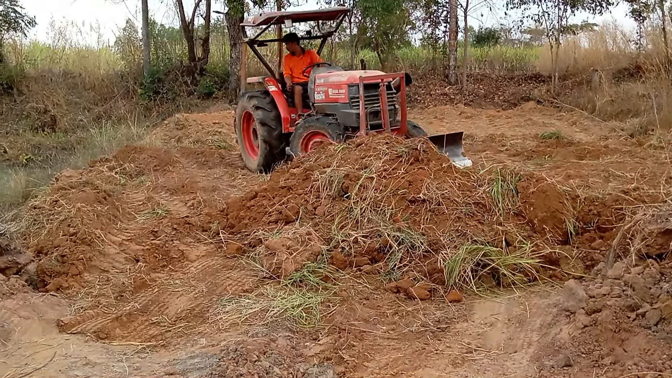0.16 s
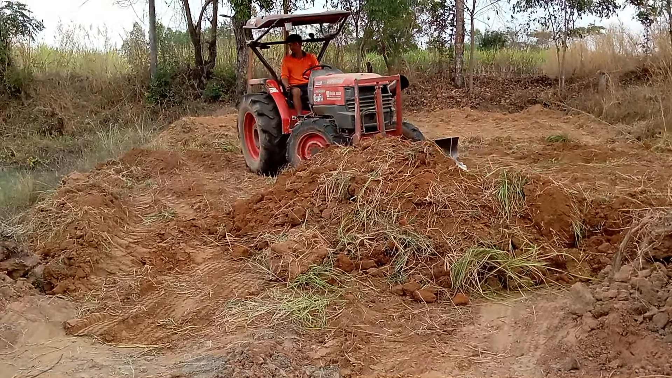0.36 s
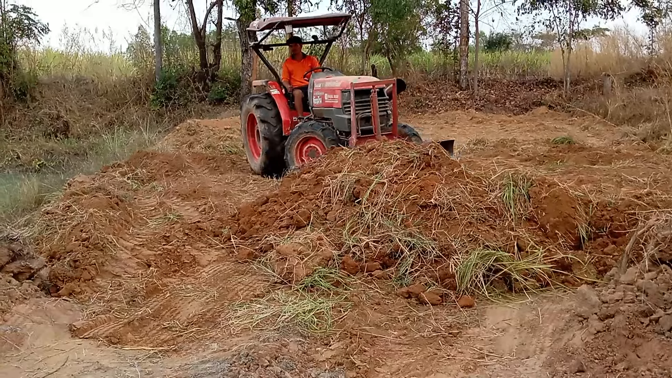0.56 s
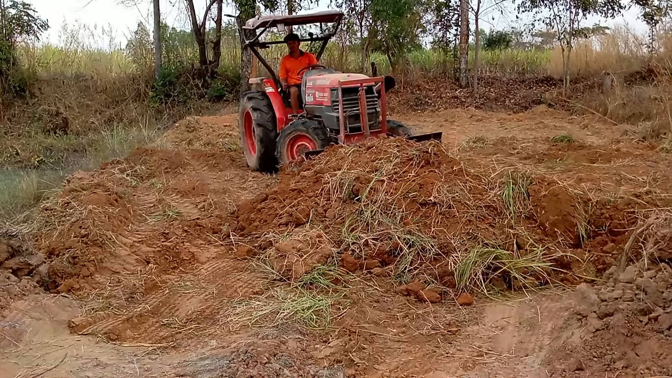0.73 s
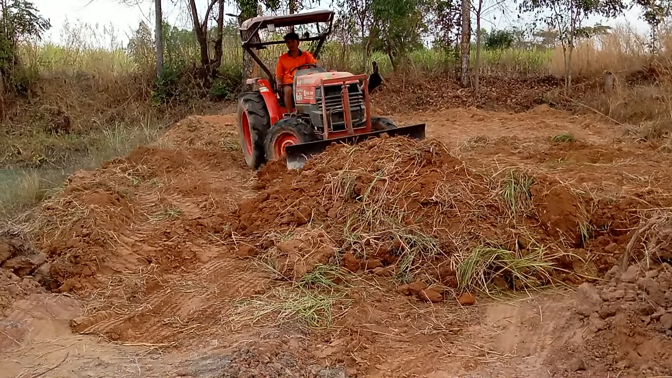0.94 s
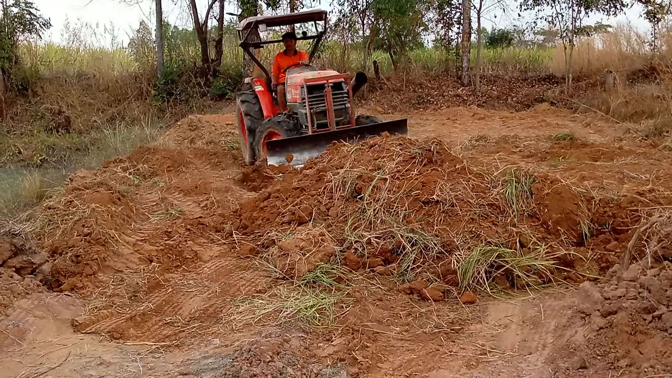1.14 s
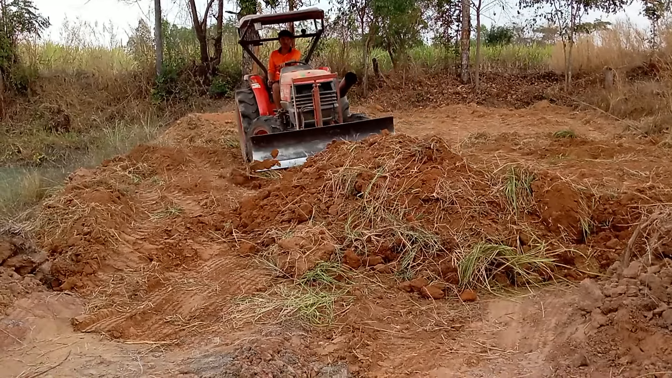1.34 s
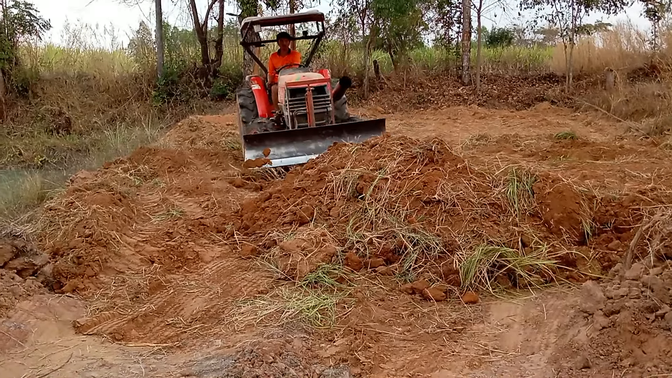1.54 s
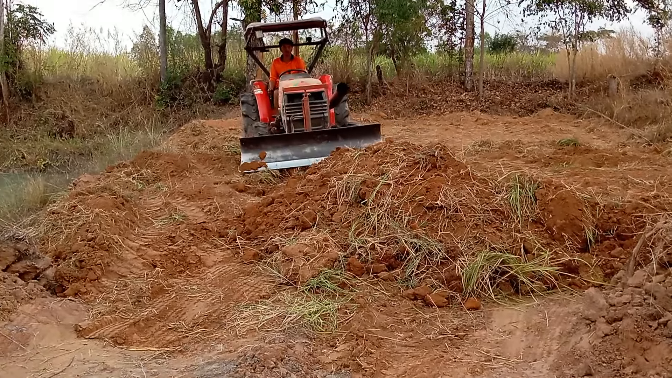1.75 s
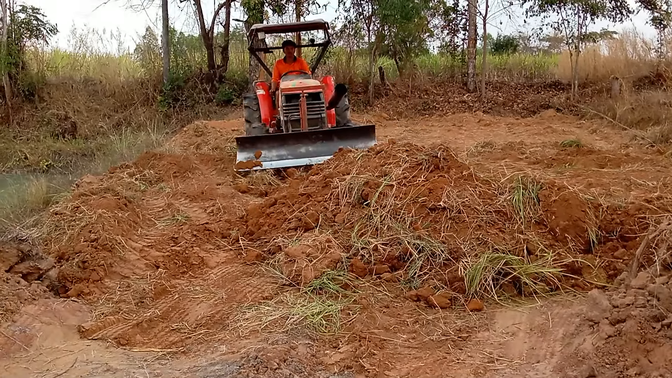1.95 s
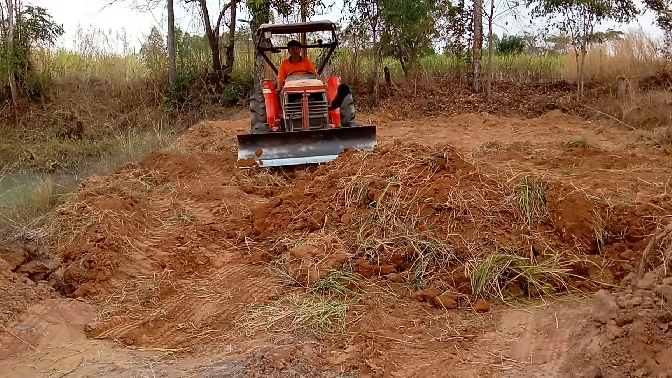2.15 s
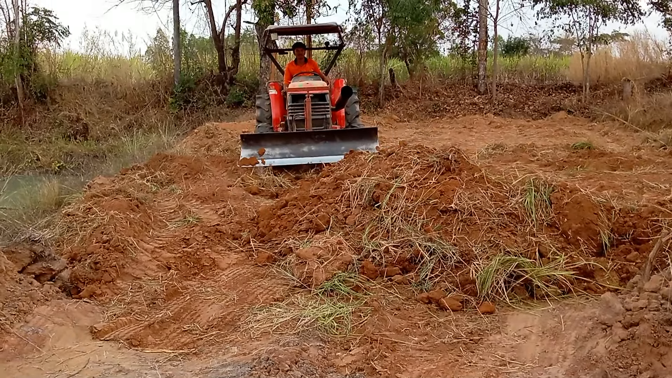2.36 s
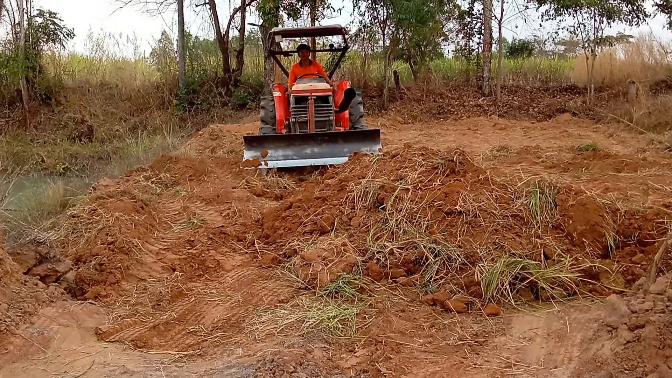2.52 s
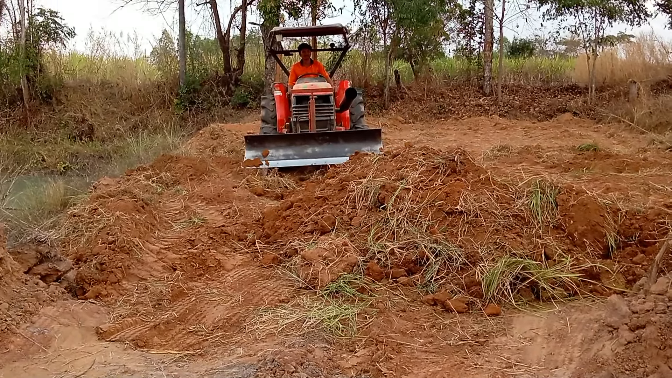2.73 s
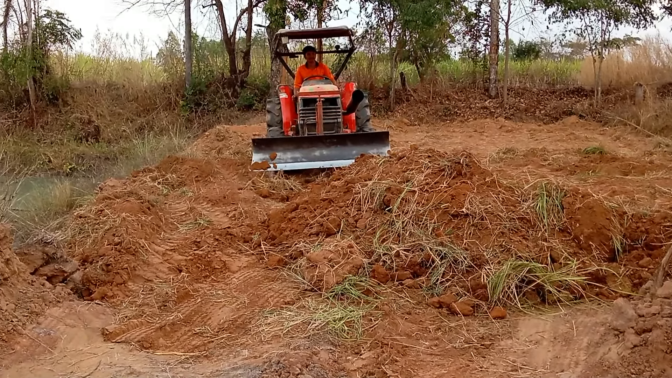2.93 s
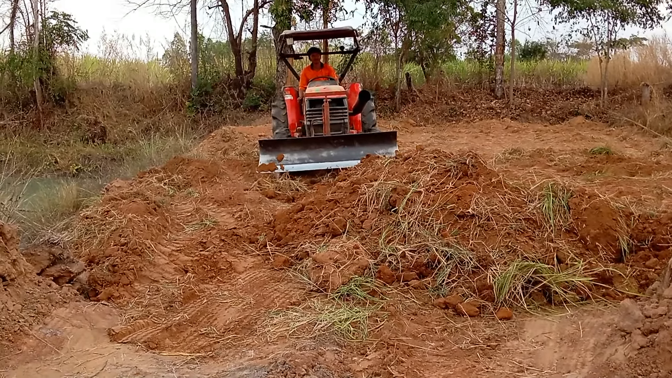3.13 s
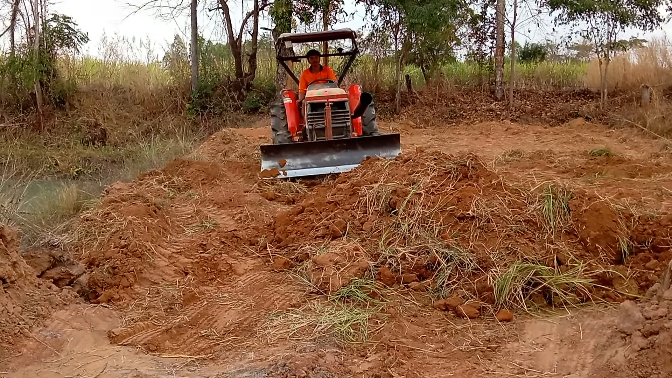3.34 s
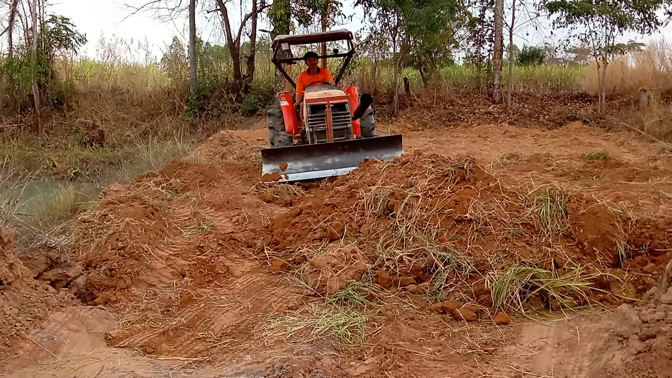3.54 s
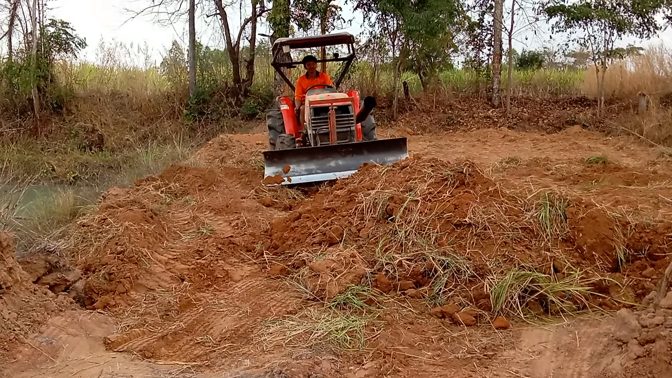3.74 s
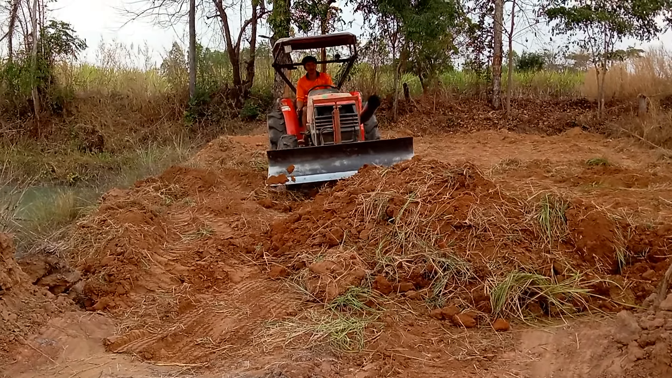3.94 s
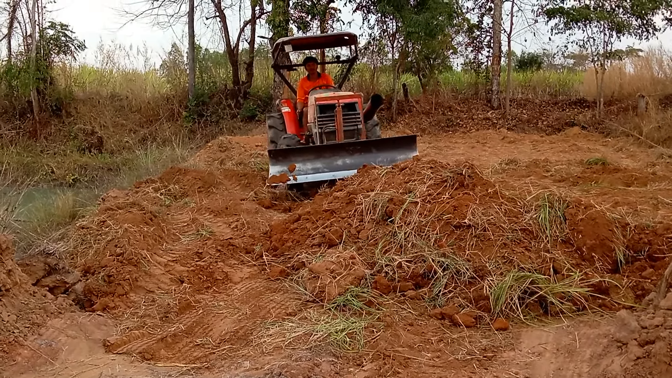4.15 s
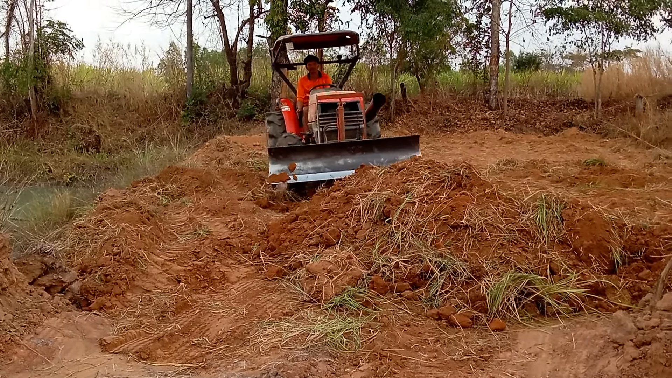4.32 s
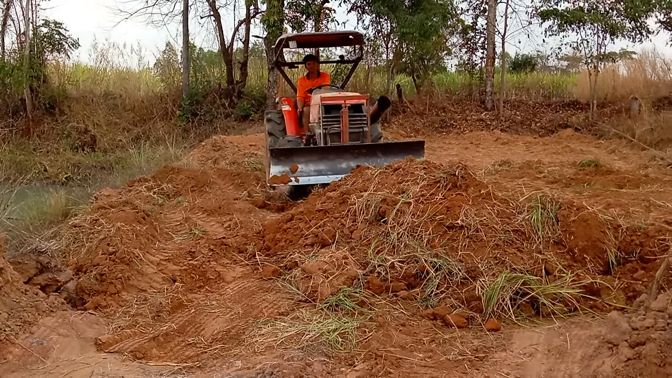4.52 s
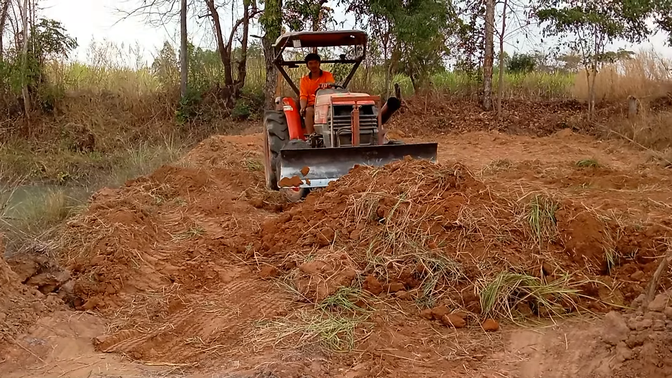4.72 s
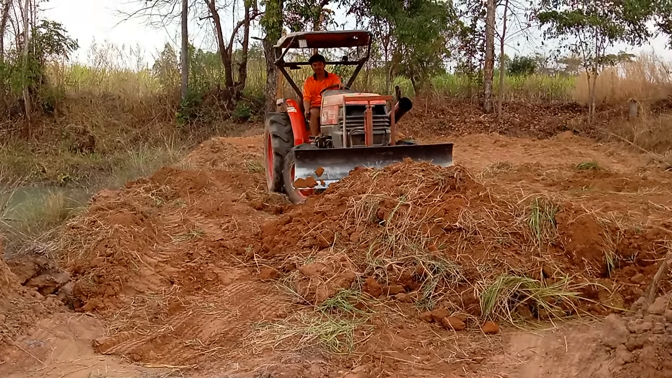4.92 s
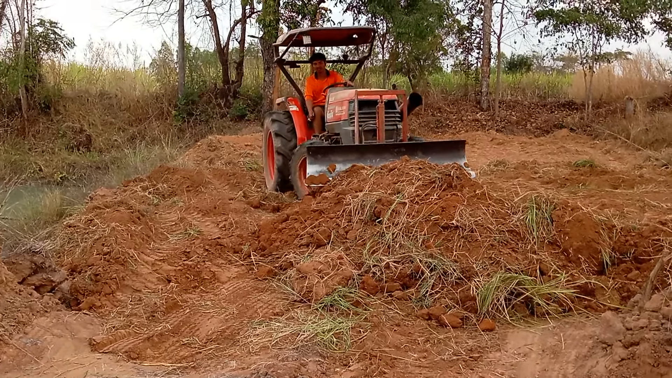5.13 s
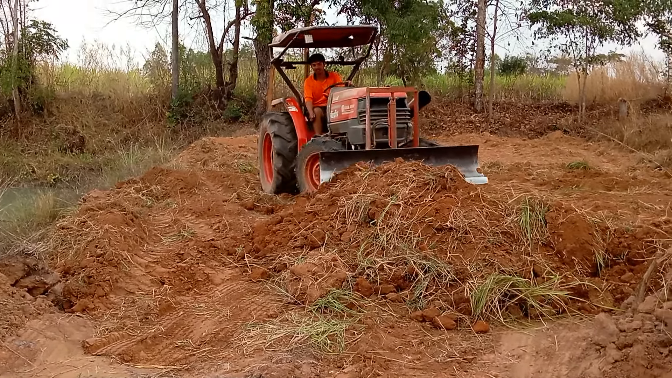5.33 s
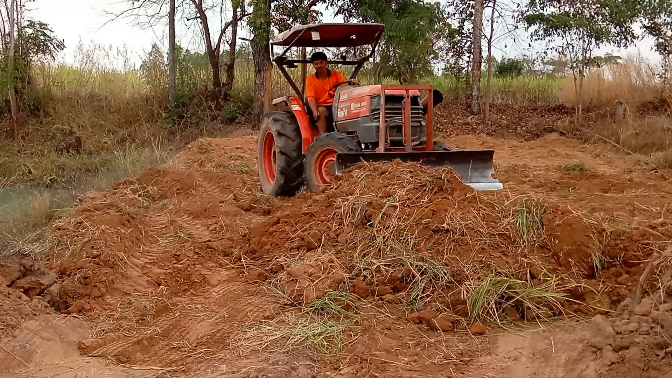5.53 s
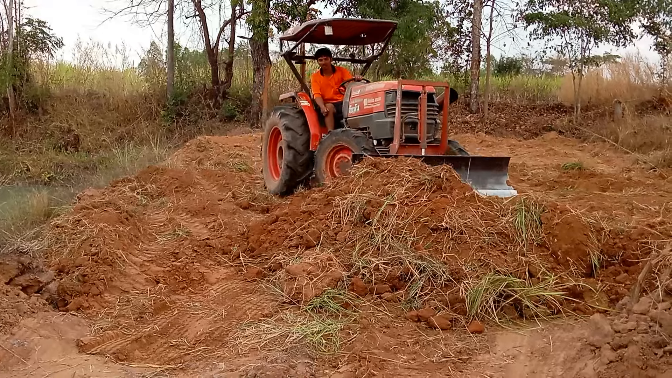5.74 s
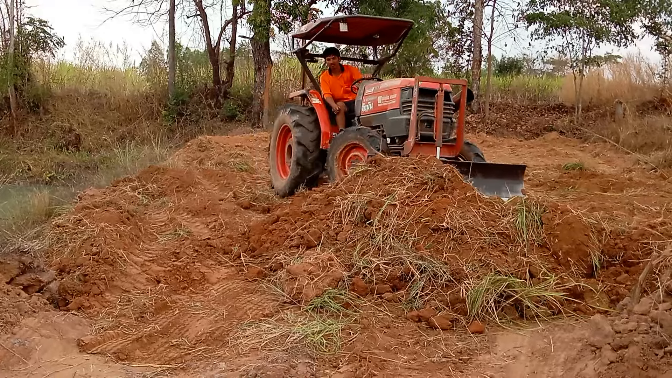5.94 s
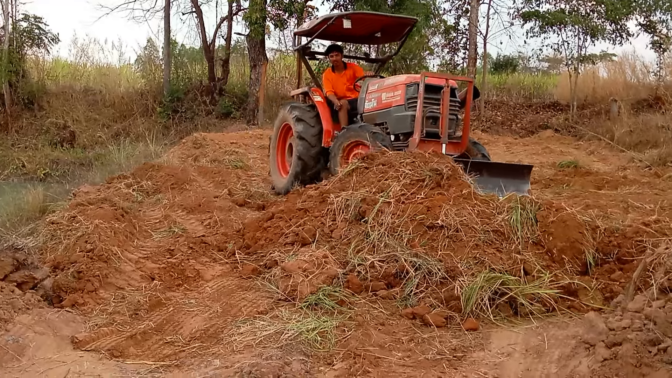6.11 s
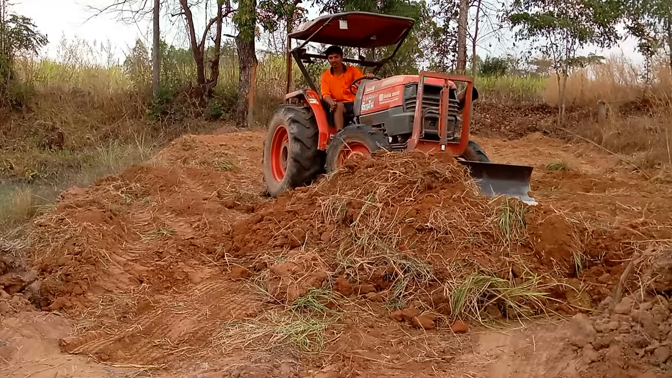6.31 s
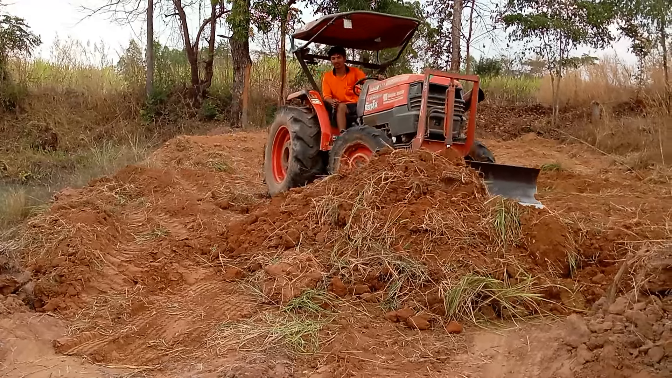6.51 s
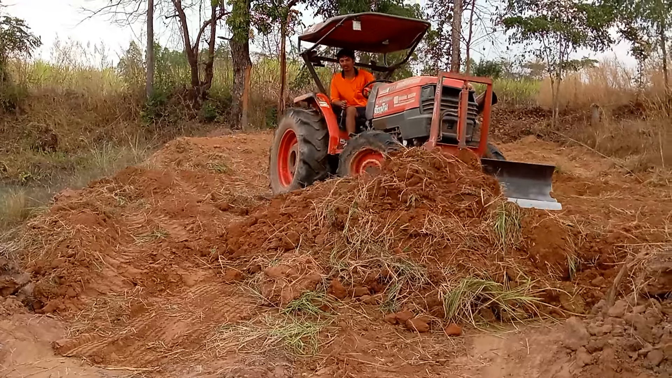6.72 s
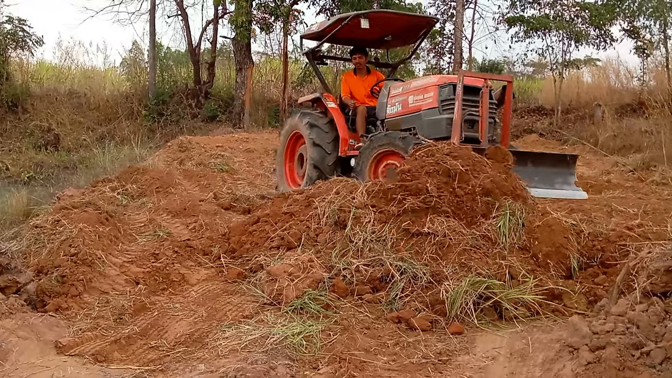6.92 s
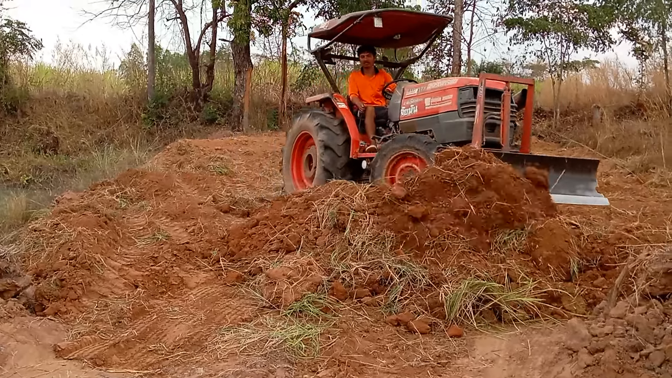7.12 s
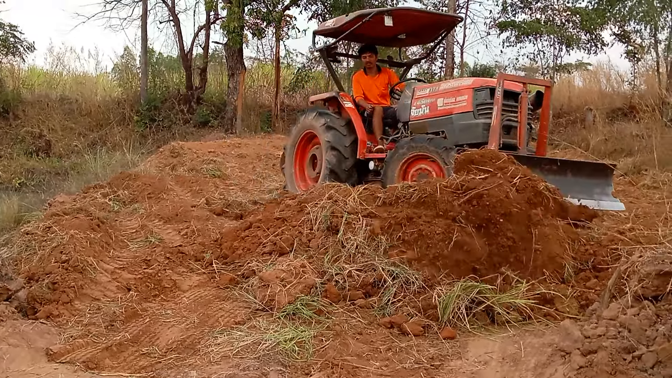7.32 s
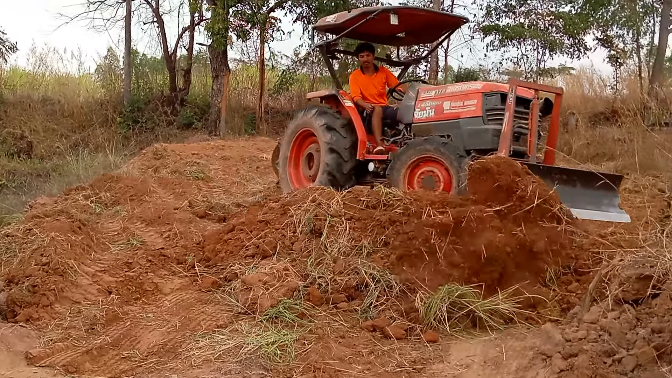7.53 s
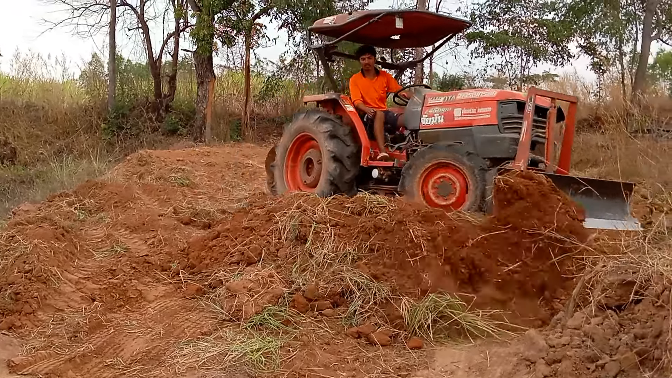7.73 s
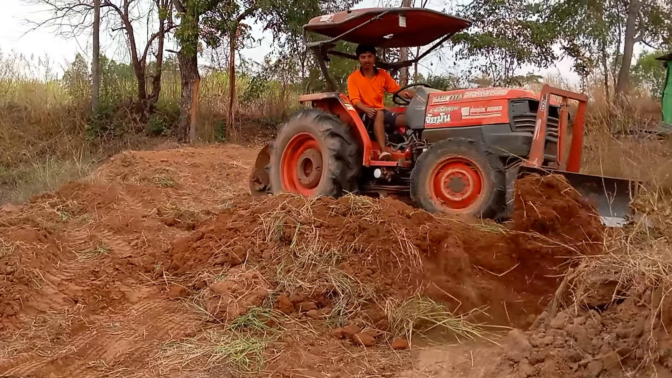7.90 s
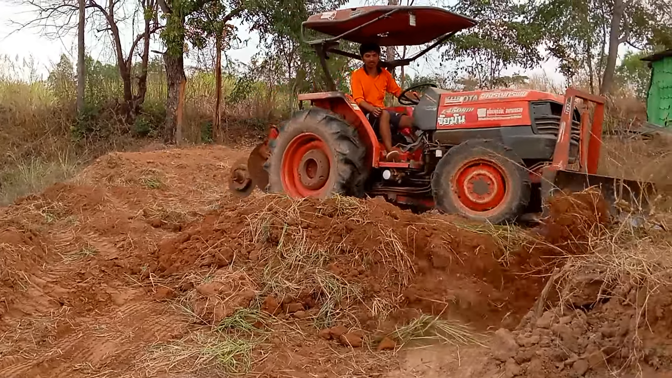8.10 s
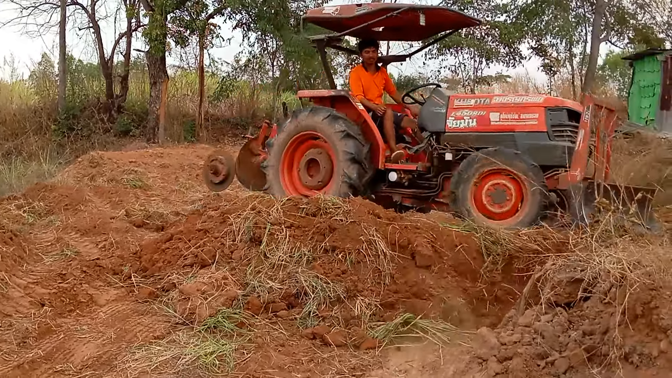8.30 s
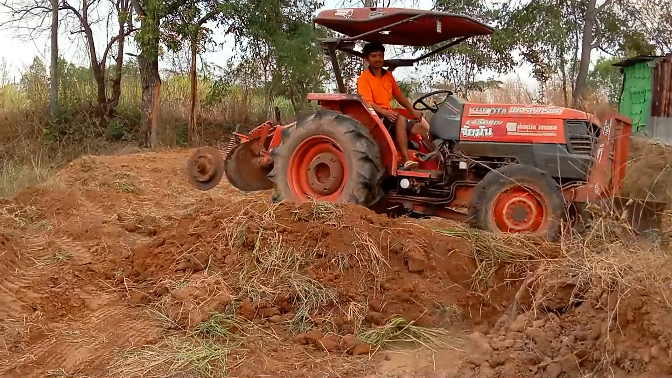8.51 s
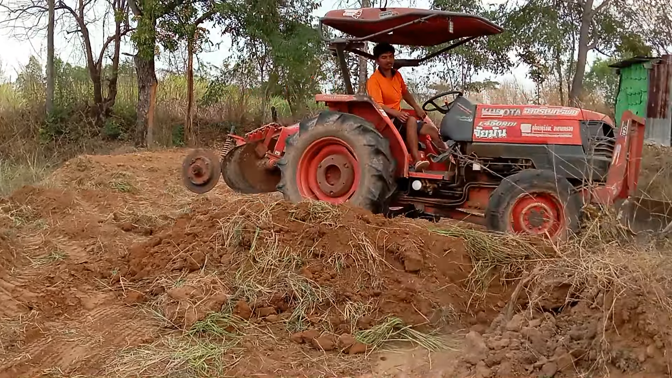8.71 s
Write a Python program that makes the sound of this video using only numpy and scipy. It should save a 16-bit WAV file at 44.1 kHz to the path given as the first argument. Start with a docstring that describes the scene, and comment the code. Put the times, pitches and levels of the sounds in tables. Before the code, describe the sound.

A diesel tractor runs some metres away in an open field. It starts with a loping chug, sinks to a weak coast with two short barking surges, then revs up sharply. The engine holds a loud, booming, rasping drone under load, with ticking valves beneath it, while dry earth scrapes faintly over the steel blade and a few clods knock. Near the end it is throttled back.

```python
"""Diesel tractor working a bare field

Some metres away, a four-cylinder diesel idles, coasts while the governor catches it twice, revs up,
pushes a heap of soil and is throttled back. Every firing booms in the muffler and blows a rasping puff
through the tail pipe. Beneath it valves tick, narrow buzzes come and go, the body hums and earth
scrapes the blade."""
import sys
import numpy as np
from scipy import signal
from scipy.fft import rfft, irfft, next_fast_len
from scipy.io import wavfile
from scipy.ndimage import uniform_filter1d

SR = 44100
rng = np.random.default_rng(int(sys.argv[2]) if len(sys.argv) > 2 else 0)


def materialize(psi):
    """Save the field psi as 16-bit PCM at rate SR to the path in sys.argv[1].

    A 1-D psi becomes a single channel; in a 2-D psi each row is a channel.
    """
    bounded = np.clip(np.atleast_2d(psi).T, -1, 1)
    quanta = np.round(bounded * 32767).astype(np.int16)
    wavfile.write(sys.argv[1], SR, quanta)


N = 386316
TIME = np.arange(N) / SR
IDLE_HZ = 28  # firings per second

# the four cylinders in firing order: boom_db, puff_db, lateness (share of the firing interval)
CYLINDERS = [(.6, -.6, .028), (-.8, -.5, -.002), (-.6, .9, -.028), (.9, .1, .005)]


def exhaust(times, boom_db, puff_db):
    """Gas pulses boom in the muffler and leave the tail pipe as roar, rasp, hiss and spit."""
    roar = amp(level(-48.5, fuel_db=11, octave_db=6.5, near_db=4.5, side_db=0.5))
    rasp = amp(level(-48, fuel_db=19, octave_db=3.5, near_db=2.7, side_db=-1.9))
    hiss = amp(level(-66.5, fuel_db=33.5, octave_db=0.1, near_db=1.9, side_db=-2.5))
    spit = hiss * (hiss / amp(-45)) ** 0.093  # only hard puffs reach the very top
    uneven = (firing_rate().min() / firing_rate(times)) ** 1.03  # slow running burns less evenly
    burn, push, drift = rng.standard_normal((3, len(times))) * uneven
    boom = muffler(times - .002 + 0.00032 * drift, boom_db * (1 + 1.2 * uneven) + 2.5 * push)
    boom /= np.sqrt(running_power(boom, SR // 7, SR // 10) + 1e-9)
    accent_db = 1.8 * puff_db + 1.5 * burn
    out = boom_gain() * boom
    roar *= throb(times - .0015, accent_db, scatter_db=2.36, rise_s=0.0028, steady_db=7.5)
    out += jet(roar, 446, 1190, repeat=0.42)
    rasp *= throb(times, accent_db, scatter_db=0.8, rise_s=0.0036, steady_db=-0.9)
    out += jet(rasp, 1096, 3380, repeat=0.23, shimmer_db=3)
    hiss *= throb(times, accent_db, scatter_db=3, rise_s=0.0032, steady_db=-4)
    out += jet(hiss, 3597, 8900, shimmer_db=4.5)
    spit *= throb(times, accent_db, scatter_db=2.5, rise_s=0.003, steady_db=-21)
    return out + amp(-15) * jet(spit, 10840, 20000, shimmer_db=6)


def firings():
    """Exhaust valve openings with their boom and puff accents; uneven spacing makes the engine lope."""
    elapsed = np.cumsum(firing_rate()) / SR - .14  # counted in firings
    count = np.arange(int(elapsed[-1]) + 1)
    boom_db, puff_db, lateness = np.array(CYLINDERS)[count % len(CYLINDERS)].T
    return np.interp(count + lateness, elapsed, TIME), boom_db, puff_db


def firing_rate(at=TIME):
    """Firings per second: the governor's surges ride on the slow rise and fall of the revs."""
    # engine speed: time_s, rate_hz
    revs = [(0.0, 37.655), (0.357, 26.804), (0.735, 29.351), (1.514, 28.043), (1.787, 28.527),
            (2.118, 24.889), (3.282, 23.2), (3.5, 36.682), (3.945, 47.061), (4.266, 50.809),
            (4.502, 49.645), (4.782, 52.505), (5.274, 52.221), (5.598, 49.166), (5.997, 51.419),
            (6.508, 51.914), (7.291, 55.924), (7.592, 53.757), (7.966, 55.774), (8.253, 44.709),
            (8.76, 34.965)]
    # the governor catches the coasting engine: start_s, gained_hz, fall_s
    surges = [(2.368, 5.76, .233), (2.809, 5.07, .357)]
    rise_s = .12
    lift = sum(gained_hz * np.interp(at, [s, s + rise_s, s + rise_s + fall_s], [0, 1, 0])
               for s, gained_hz, fall_s in surges)
    return curves(revs, at)[0] + lift


def fuel(at=TIME):
    """Share of the full dose that is injected."""
    # idling, coasting, pushing, throttled back: time_s, dose (0-1)
    doses = [(0, 0.62), (.3, 0.73), (.58, 0.99), (1.2, 0.56), (1.45, 0.7), (1.8, 0.68), (1.87, 0.07),
             (2.55, 0.04), (2.7, 0), (2.92, 0.08), (3.02, 0.02), (3.12, 0.14), (3.3, 0), (3.48, 1),
             (4.5, 0.82), (5.5, 0.82), (6.9, 0.79), (7.35, 0.66), (7.98, 0.71), (8.05, 0.42), (8.76, 0.09)]
    return np.clip(curves(doses, at)[0], 0, 1)


def level(base_db, fuel_db, octave_db, near_db, side_db, at=TIME):
    """Level ride in dB, lifted or cut by fuel, octaves of speed above idle, nearness and turning."""
    # the tractor backs off, comes closer and turns: time_s, nearness (0-1), side_on (0-1)
    path = [(0, 0.34, 0.72), (2.5, 0, 0), (5.2, 0.2, 0.35), (6.3, 0.48, 0.01), (7.8, 0.96, 0.86),
            (8.3, 0.06, 1), (8.76, 0, .98)]
    near, side = np.clip(curves(path, at), 0, 1)
    octaves = np.log2(firing_rate(at) / IDLE_HZ)
    return base_db + fuel_db * fuel(at) + octave_db * octaves + near_db * near + side_db * side


def boom_gain():
    """Weight of the low exhaust note, which collapses when almost no fuel is injected."""
    starved_db = -17.5 * np.exp(-fuel() / 0.017)
    return amp(level(-36, fuel_db=8, octave_db=7.5, near_db=6.5, side_db=-4.5) + starved_db)


def muffler(times, pulse_db):
    """Each pulse rings the chambers: heat raises their pitch, fast flow damps them."""
    # chamber modes before heat and damping scale them: pitch_hz, width_hz, level_db
    chambers = [(102.4, 19.3, 2), (201.3, 15, 4.5), (230.6, 35.6, -8)]
    heat = gas_heat(times)[:, None]
    # a sharp pulse favours the upper chambers
    sharp_db = level(-1, fuel_db=-0.5, octave_db=6, near_db=4, side_db=-11.5, at=times)[:, None]
    damping = 0.7 * (firing_rate(times)[:, None] / IDLE_HZ) ** 1.16
    t = np.arange(SR // 7) / SR
    rings = 0
    for k, (hz, width, db) in enumerate(chambers):
        gain = (-1) ** k * amp(db + sharp_db * (k > 0)) * width / chambers[0][1]
        rings += gain * np.exp(-np.pi * width * damping * t) * np.cos(2 * np.pi * hz * heat * t)
    pulses = placed(times, amp(pulse_db)[:, None] * rings)
    return coloured(pulses, lambda f: band(f, 67, np.inf, order=4) * band(f, 0, 285, order=12))


def gas_heat(times):
    """Speed of sound as a ratio: hard work heats the gas, the more so once the muffler is warm."""
    cold_ratio, heat_rise, warm_up_s = 0.9, 0.13, 4.1
    power = fuel() * firing_rate() / IDLE_HZ
    step = 1 / (warm_up_s * SR)
    warmth = signal.lfilter([step], [1, step - 1], power)
    return np.interp(times, TIME, cold_ratio + heat_rise * power * warmth)


def puffs(times, db, rise_s):
    """Envelope with a quick swell and a slower tail for each event."""
    age = np.arange(SR // 20) / SR / rise_s
    swell = (age * np.exp(1 - age)) ** 1.2
    tail = 0.043 * age * np.exp(-age / 2.46)
    return placed(times, amp(db)[:, None] * (swell + tail))


def throb(times, db, scatter_db, rise_s, steady_db):
    """The engine's gas flow at a power near 1: uneven puffs over a steady stream."""
    even = puffs(times, np.zeros_like(times), rise_s)
    power = running_power(even, SR // 12, SR // 12) + 1e-6
    uneven = puffs(times, db + scatter_db * rng.standard_normal(len(times)), rise_s)
    stream_db = level(3.5, fuel_db=-19.5, octave_db=10.5, near_db=-12.1, side_db=13)
    steady = amp(stream_db + steady_db) ** 2
    return np.sqrt((uneven ** 2 / power + steady) / (1 + steady))


def jet(flow, lo_hz, hi_hz, repeat=0.0, shimmer_db=0.0):
    """Turbulence that follows the flow, through one band of the tail pipe."""
    # the share 'repeat' is a shock pattern that comes back with every round of the cylinders
    starts = firings()[0][::len(CYLINDERS)]
    age_s = TIME - starts[np.maximum(np.searchsorted(starts, TIME) - 1, 0)]
    shock = rng.standard_normal(SR)[np.round(age_s * SR).astype(int)]
    turbulence = shimmer(rng.standard_normal(N), shimmer_db)
    stream = np.sqrt(repeat) * shock + np.sqrt(1 - repeat) * turbulence
    return coloured_level(flow * stream, lambda f: tail_pipe(f) * band(f, lo_hz, hi_hz, order=8))


def tail_pipe(f):
    """Tone of the pipe: some frequencies ring in it, others cancel."""
    # pipe resonances: pitch_hz, width_hz, level_db
    modes = [(520, 100, -4), (626, 118, -1.5), (834, 390, -5), (1012, 146, -5.5), (1368, 207, 2.5),
             (1455, 305, 1.5), (1922, 420, 0.5), (2133, 280, 7.5), (2474, 150, 1.5), (2596, 310, -7),
             (3243, 260, -3.5), (3370, 280, -6), (3800, 320, -16), (4283, 184, -13.5), (4680, 140, -14),
             (5260, 480, -17.5), (6020, 390, -15), (6607, 390, -13), (7370, 1400, -21.5), (8700, 2200, -26),
             (9990, 1230, -22), (11700, 1300, -38), (15100, 2300, -42.5)]
    # cancellations: pitch_hz, width_hz, depth_db
    notches = [(390, 77, -9), (1121, 56, -8), (1735, 34, -13.5), (2386, 37, -3), (2990, 84, -1.5),
               (3660, 80, -5.5), (4460, 156, -5.5), (5790, 130, -8), (7970, 200, -2)]
    notch_db = sum(db / (1 + ((f - hz) / width) ** 2) for hz, width, db in notches)
    return resonances(modes, f) * amp(notch_db)


def shimmer(x, depth_db):
    """Random patches of the spectrum swell and fade, so each puff has its own colour."""
    spectrum = signal.stft(x, nperseg=512)[2]
    patches = uniform_filter1d(rng.standard_normal(spectrum.shape), size=4, axis=0)
    patches = uniform_filter1d(patches, size=5, axis=1)
    gain = unit(amp(depth_db * unit(patches)))
    return signal.istft(spectrum * gain, nperseg=512)[1][:N]


def governor_kicks():
    """As the governor opens, a sudden dose of fuel makes single firings bark."""
    # heavy firings, before each layer's trim: start_s, level_db, boom_offset_db, hiss_offset_db
    kicks = [(0.4547, -16.5, -18, -23), (0.5642, -15.5, -19, -17), (2.404, -20.5, -15, -14.5),
             (2.442, -12, -30, -18.5), (2.477, -17, -12.5, -14), (2.822, -23.5, -8, -18.5),
             (2.859, -15.5, -24, -19), (2.898, -22.5, -12, -23), (3.277, -25, -7, -22),
             (3.32, -13, -28, -17), (3.355, -12.5, -16.5, -13), (3.388, -8.5, -18, -15),
             (3.425, -12.5, -15, -15)]
    start_s, db, boom_db, hiss_db = np.transpose(kicks)
    bark = jet(puffs(start_s + 0.00039, db - 9.5, rise_s=0.005), 490, 3600, shimmer_db=0.5)
    spit = jet(puffs(start_s + 0.00046, db + hiss_db, rise_s=0.0042), 4100, 15000, shimmer_db=7)
    return bark + spit + muffler(start_s - .002, db + boom_db + 4)


def valve_gear(times):
    """Valves and injectors tick twice a firing and ring the block."""
    # engine block resonances: pitch_hz, width_hz, level_db
    block = [(816, 245, 10), (1954, 130, 12.5), (3160, 350, -15), (4830, 180, -9), (5360, 250, -25),
             (6170, 110, 3.5), (7140, 440, -8), (9000, 170, -9.5), (9940, 870, -19)]
    ticks = np.concatenate([times, (times[1:] + times[:-1]) / 2])
    taps = puffs(ticks, 1.6 * rng.standard_normal(len(ticks)), rise_s=0.0016) + 0.5
    return amp(-49) * noise(lambda f: resonances(block, f), taps)


def buzz_bands(times, puff_db):
    """Narrow bands of noise buzz with the firings, each swelling and fading in its own stretch."""
    # buzzing bands: start_s, end_s, pitch_hz, width_hz, level_db
    buzzes = [(3.34, 4.18, 2513, 140, -31), (5.95, 7.33, 5860, 230, -38.5), (4.97, 8.36, 650, 117, -35.5),
              (3, 9.2, 420, 83, -52.5), (7.2, 8.5, 320, 120, -46.5), (0.37, 1.06, 3450, 120, -46)]
    pulsing = throb(times, puff_db, scatter_db=6, rise_s=0.0032, steady_db=-24)
    out = np.zeros(N)
    for start_s, end_s, hz, width, db in buzzes:
        progress = np.clip((TIME - start_s) / (end_s - start_s), 0, 1)
        swell = np.sqrt(np.abs(np.sin(np.pi * progress)))
        out += amp(db) * swell * noise(lambda f: resonances([(hz, width, 0)], f), pulsing)
    return out


def body_hum():
    """At working speed the body hums on a few overtones of the crank."""
    # overtones: multiple (of the firing rate), level_db (against the boom, at top speed)
    overtones = [(5.25, -20.5), (5.75, -32), (6.75, -27), (7.25, -31), (8.75, -25.5), (10.25, -20.5),
                 (12, -14.5), (13, -20)]
    rate = firing_rate()
    phase = 2 * np.pi * np.cumsum(rate) / SR
    gain = boom_gain() * (rate / rate.max()) ** 5.8
    return gain * sum(amp(db) * np.sin(k * phase + rng.uniform(0, 2 * np.pi)) for k, db in overtones)


def soil():
    """Crumbs of dry earth scrape over the steel blade, and a few clods knock it."""
    # soil sliding along the blade and under the tyres: time_s, level_db
    slide = [(0, -47), (1.8, -85), (3.3, -67), (5.5, -43.5), (6.3, -42), (6.9, -38.5), (7.3, -46), (8, -43),
             (8.3, -49.5), (8.76, -49)]
    # clods and stones, before their trim: start_s, level_db
    clods = [(6.796, -19), (6.8184, -25), (6.8708, -25), (7.2494, -26)]
    # blade resonances: pitch_hz, width_hz, level_db
    blade = [(2740, 270, 7.5), (3870, 490, 2), (4770, 1100, 0.5), (5700, 150, 6.5), (6730, 510, -1.5),
             (9600, 4800, -35)]
    start_s, db = np.transpose(clods)
    crumbs = unit(rng.standard_normal(N) * rng.exponential(size=N) ** 2)
    pressure = amp(curves(slide)[0]) + puffs(start_s, db - 10, rise_s=0.003)
    return coloured_level(crumbs * pressure, lambda f: resonances(blade, f))


def field():
    """A faint bed of outdoor air, and a rumble that grows with the engine's effort."""
    # tone of the open air: frequency_hz, level_db
    air_tone = [(20, 19), (60, -15), (150, 4), (350, -16), (1500, -28.5), (6000, -20), (15000, -90)]
    hz, db = np.transpose(air_tone)
    air = noise(lambda f: amp(np.interp(np.log(f + 1), np.log(hz), db)))
    rumble = noise(lambda f: band(f, 97, 288, order=6))
    return amp(-66) * air + amp(-24) * boom_gain() * rumble


def amp(db):
    """Decibels to gain."""
    return 10 ** (np.asarray(db) / 20)


def unit(x):
    """Scaled to rms 1."""
    return x / np.sqrt(np.mean(x ** 2) + 1e-20)


def running_power(x, first, second):
    """Power smoothed by two windows in turn, their lengths in samples."""
    return np.abs(uniform_filter1d(uniform_filter1d(x ** 2, first), second))


def curves(rows, at=TIME):
    """Each column after the time, read at the given moments."""
    time_s, *columns = np.transpose(rows)
    return [np.interp(at, time_s, column) for column in columns]


def placed(times, shapes):
    """Sum of short shapes, one row for each start time."""
    index = np.maximum(np.round(times * SR).astype(int), 0)[:, None] + np.arange(shapes.shape[1])
    return np.bincount(index.ravel(), shapes.ravel(), N)[:N]


def resonances(modes, f):
    """Gain of a set of steep-sided peaks."""
    return np.sqrt(sum(amp(db) ** 2 / (1 + 2 * ((f - hz) / width) ** 2) ** 3 for hz, width, db in modes))


def band(f, lo_hz, hi_hz, order):
    """Gain of a band-pass."""
    return 1 / np.sqrt((1 + (lo_hz / (f + 1e-3)) ** (2 * order)) * (1 + (f / hi_hz) ** (2 * order)))


def coloured(x, gain):
    """x through the causal filter that has this gain over frequency."""
    size = 2 * next_fast_len((N + SR) // 2)
    cepstrum = irfft(np.log(np.maximum(gain(np.fft.rfftfreq(size, 1 / SR)), 1e-6)))
    cepstrum[1:size // 2] *= 2
    cepstrum[size // 2 + 1:] = 0
    return irfft(rfft(x, size) * np.exp(rfft(cepstrum)))[:N]


def coloured_level(x, gain):
    """The same filter with make-up gain, so white noise keeps its level."""
    power = np.mean(gain(np.fft.rfftfreq(SR, 1 / SR)) ** 2)
    return coloured(x, gain) / np.sqrt(power)


def noise(gain, envelope=1):
    """Noise shaped by an envelope, then coloured, at rms 1."""
    return unit(coloured(envelope * rng.standard_normal(N), gain))


def scene():
    """The tractor in the open, in mono."""
    times, boom_db, puff_db = firings()
    engine = exhaust(times, boom_db, puff_db) + governor_kicks()
    engine += valve_gear(times) + buzz_bands(times, puff_db) + body_hum()
    return (engine + soil() + field())[None]


def record(dry):
    """Soft saturation rounds off the highest peaks, and a steep high cut removes the very top."""
    ceiling, top_hz = .44, 15850
    rounded = dry / (1 + np.abs(dry / ceiling) ** 6) ** (1 / 6)
    size = next_fast_len(N + SR // 4)
    passband = np.fft.rfftfreq(size, 1 / SR) < top_hz
    return irfft(rfft(rounded, size) * passband, size)[:, :N]


dry = scene()
out = record(dry)
materialize(out)
```